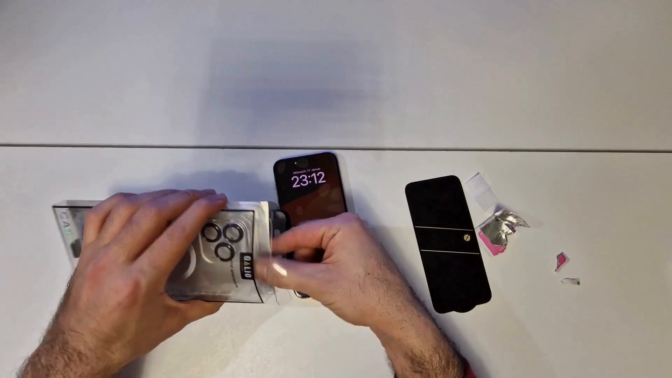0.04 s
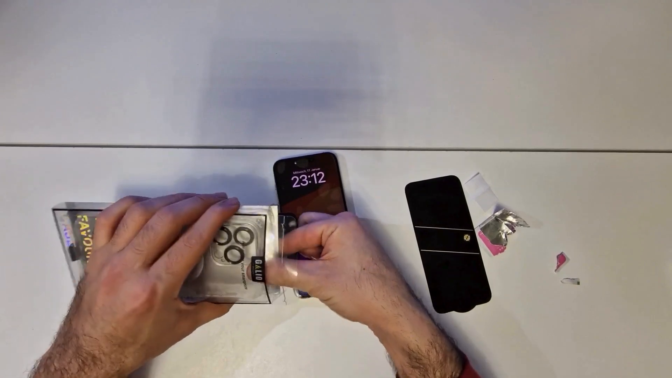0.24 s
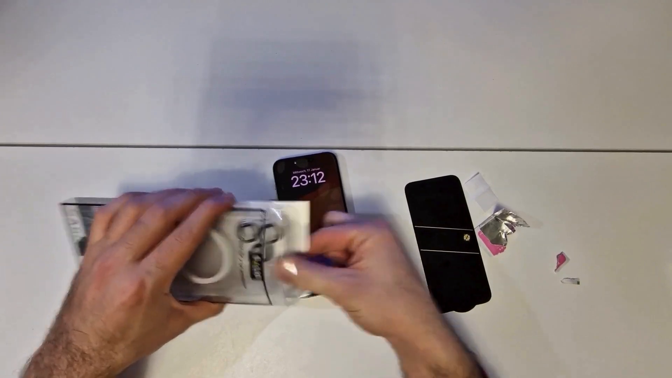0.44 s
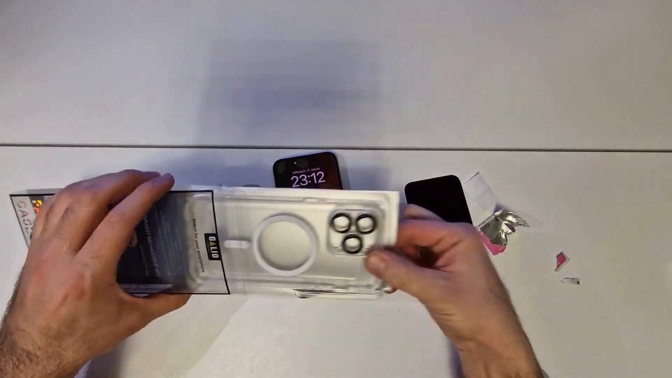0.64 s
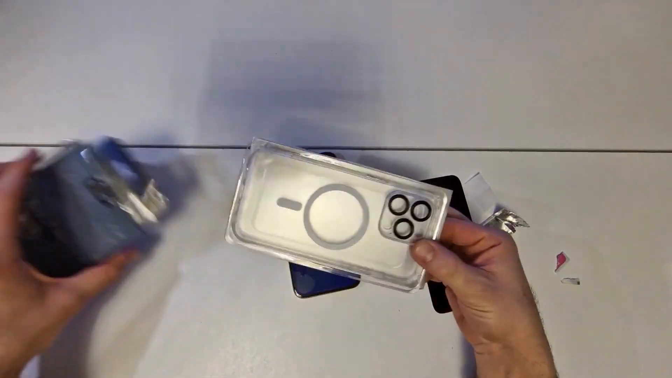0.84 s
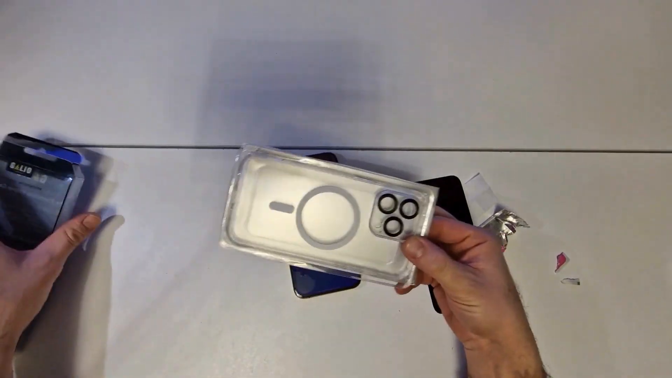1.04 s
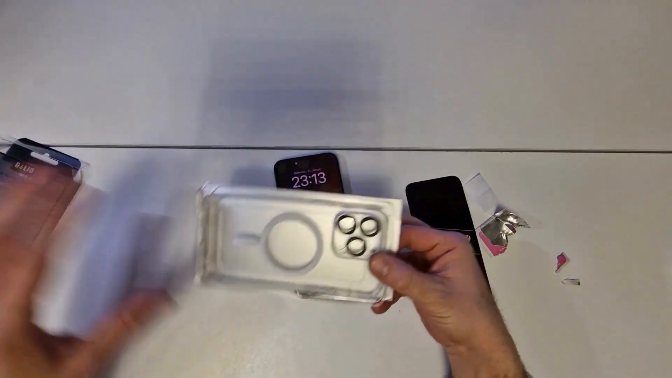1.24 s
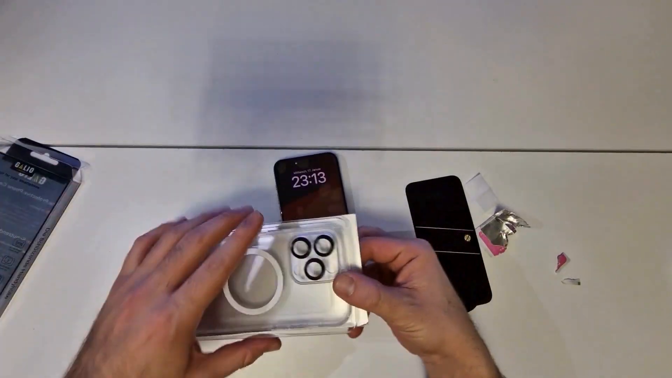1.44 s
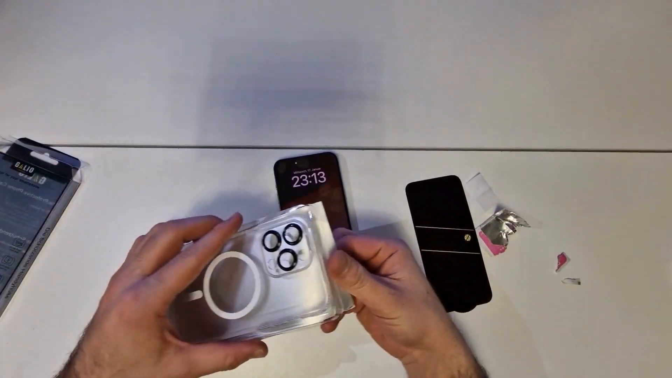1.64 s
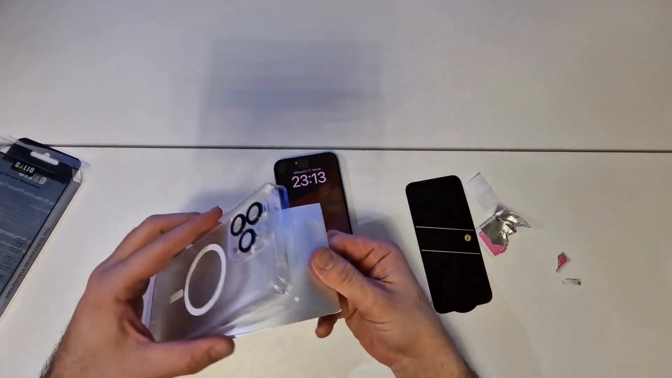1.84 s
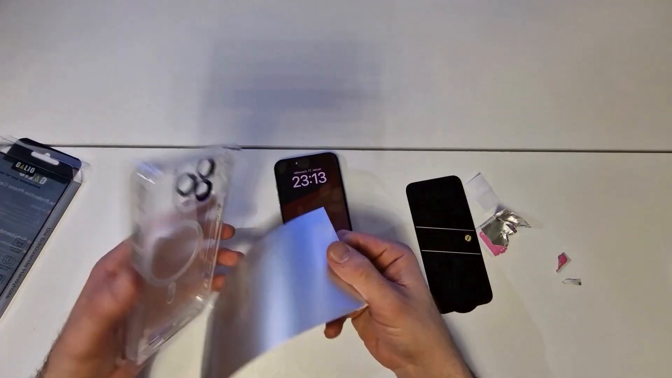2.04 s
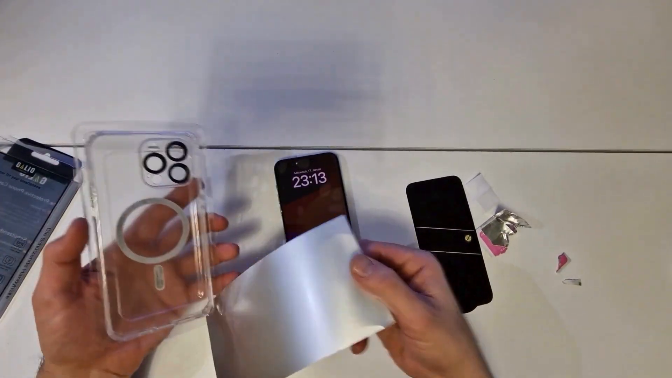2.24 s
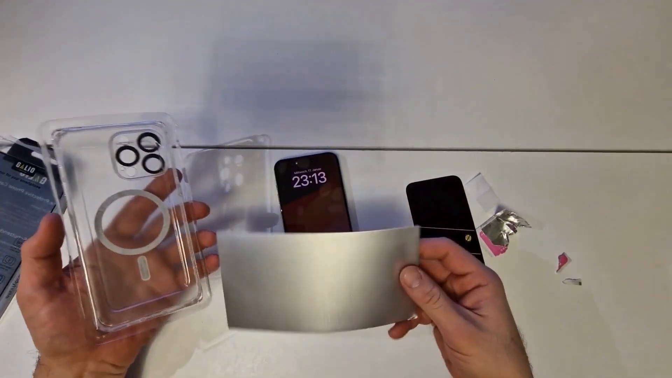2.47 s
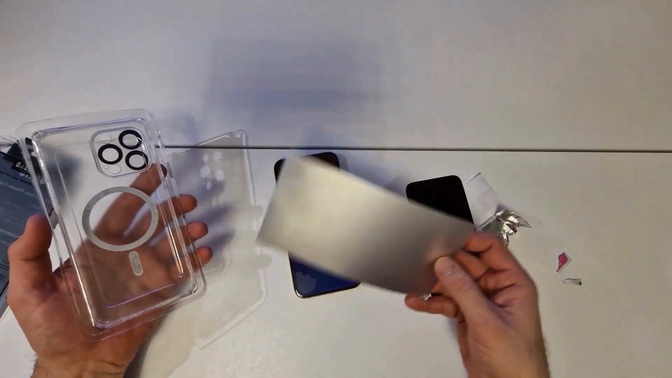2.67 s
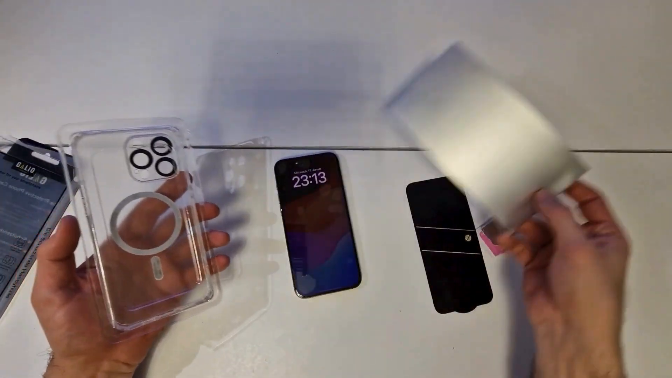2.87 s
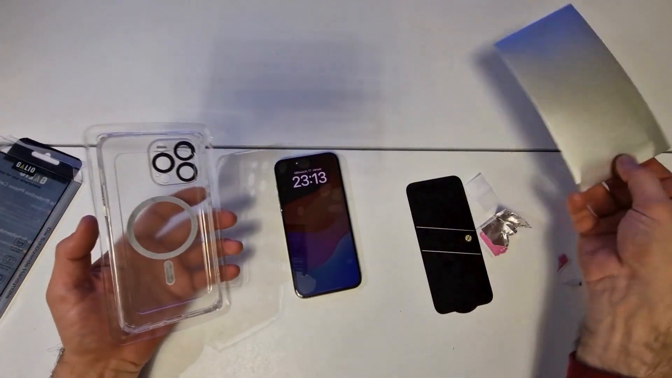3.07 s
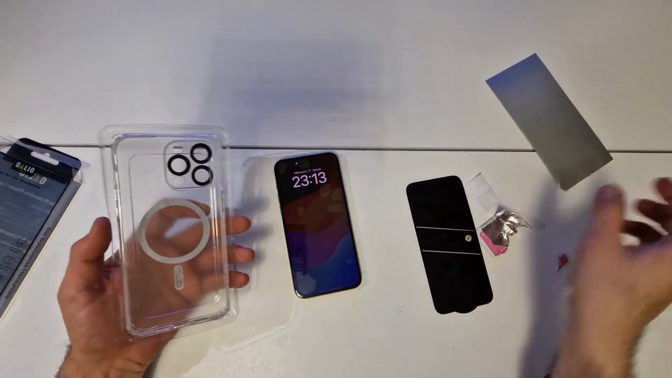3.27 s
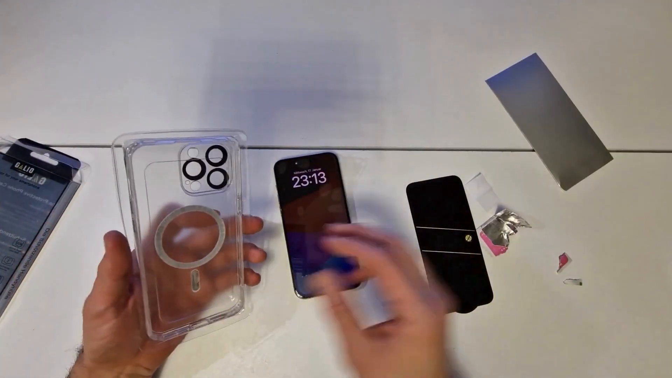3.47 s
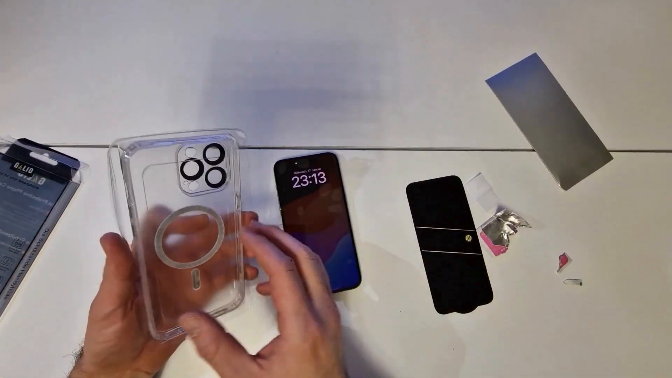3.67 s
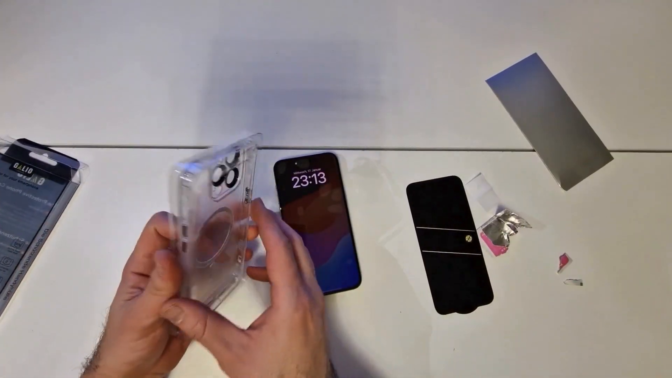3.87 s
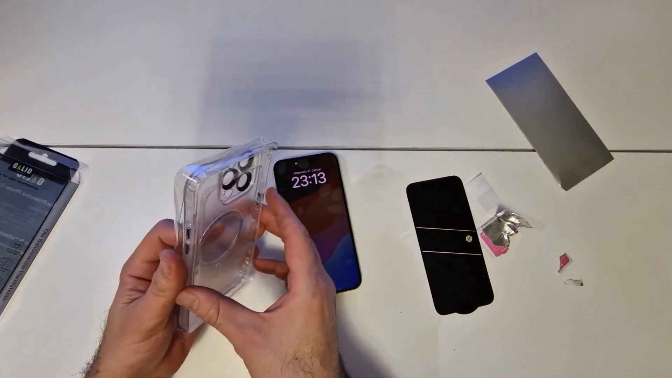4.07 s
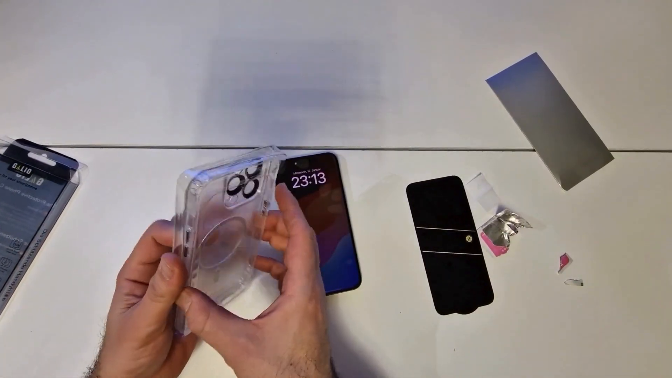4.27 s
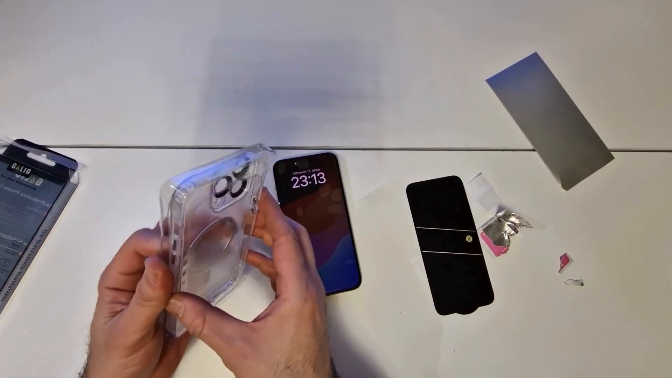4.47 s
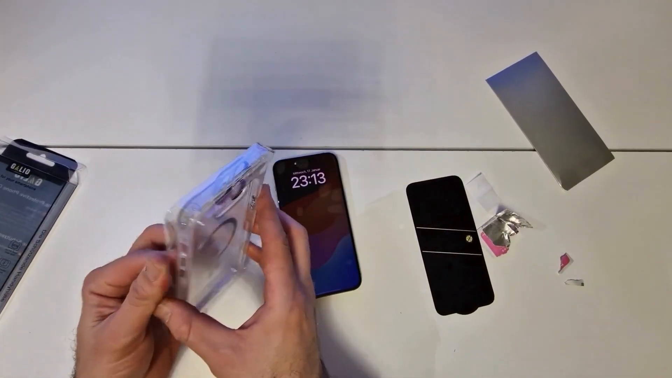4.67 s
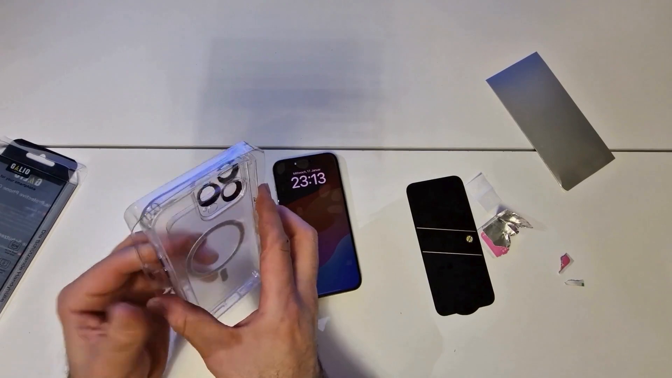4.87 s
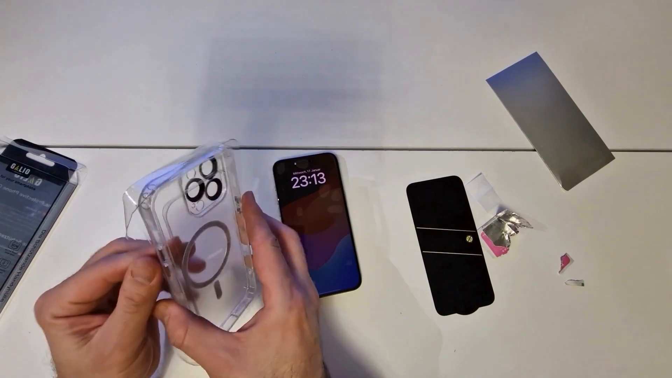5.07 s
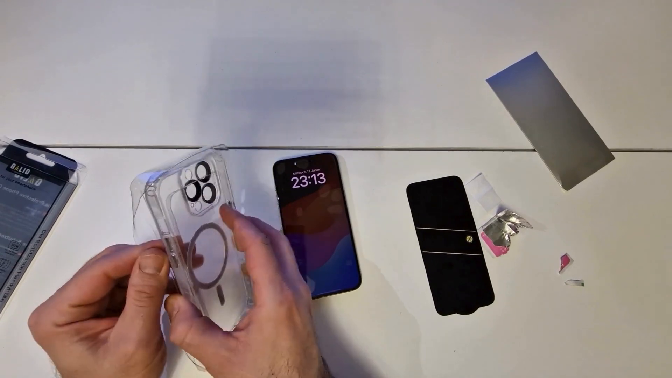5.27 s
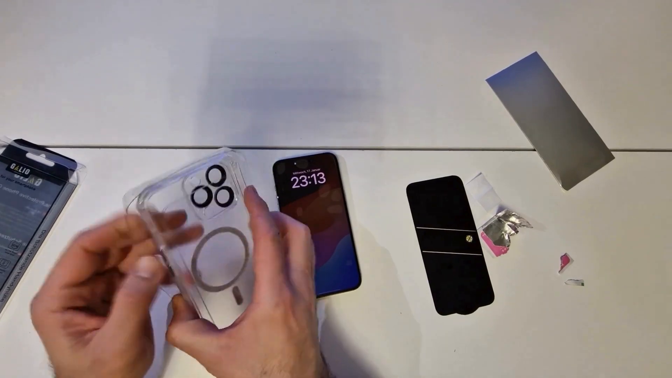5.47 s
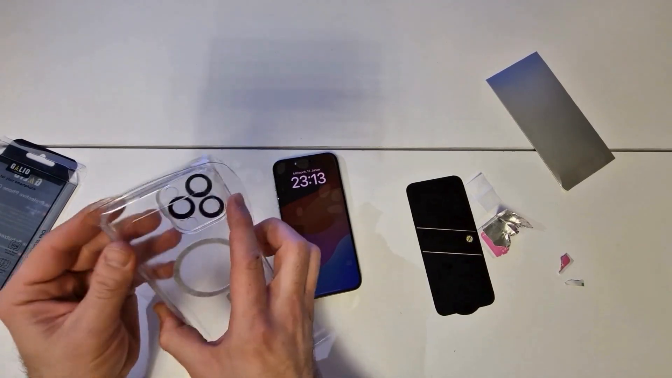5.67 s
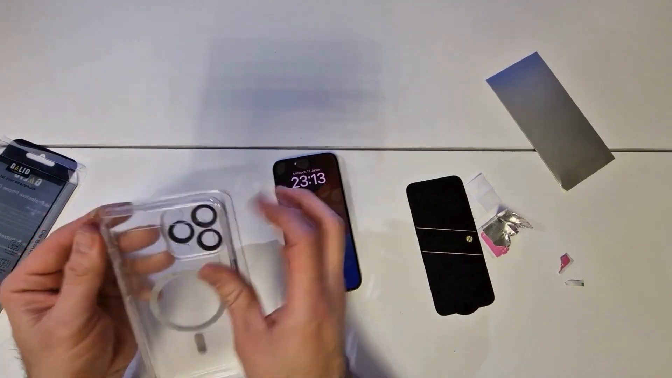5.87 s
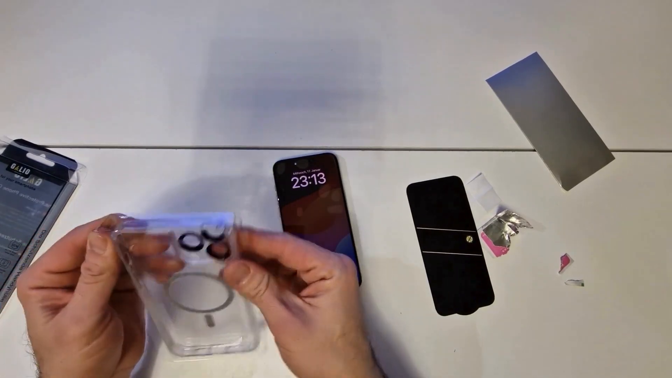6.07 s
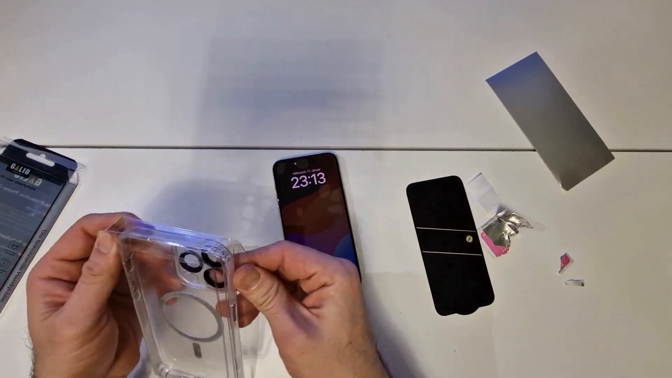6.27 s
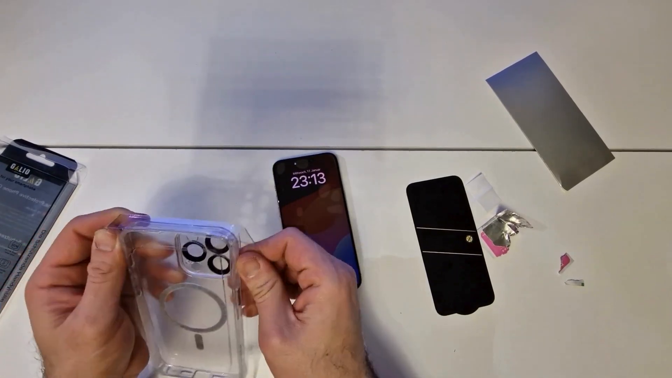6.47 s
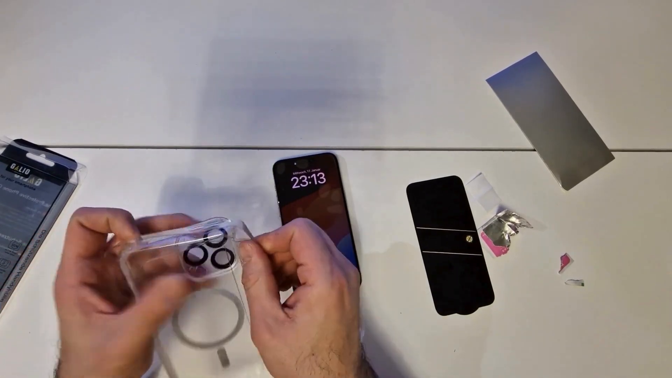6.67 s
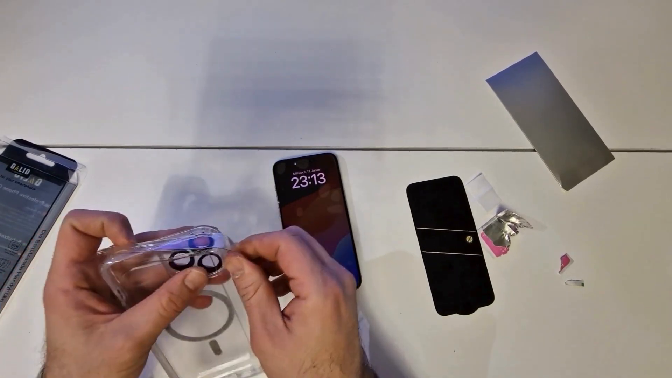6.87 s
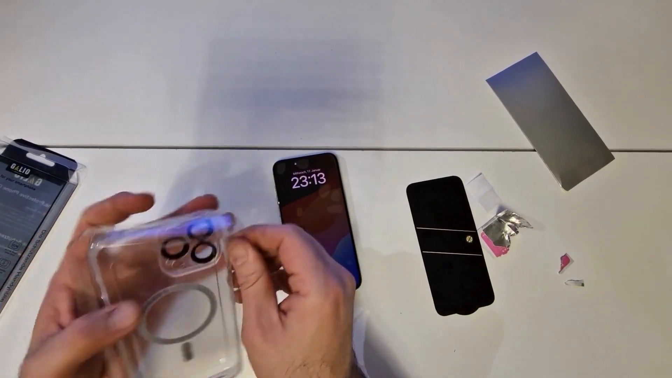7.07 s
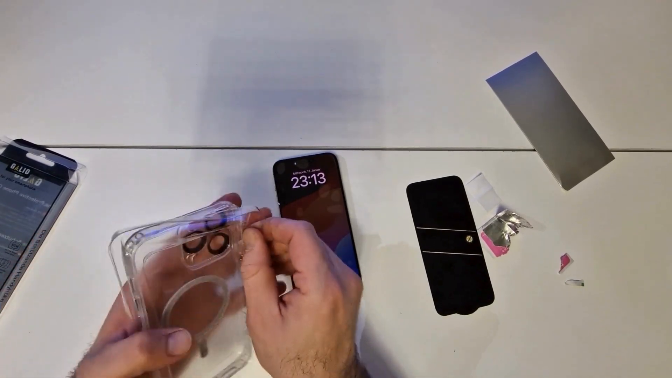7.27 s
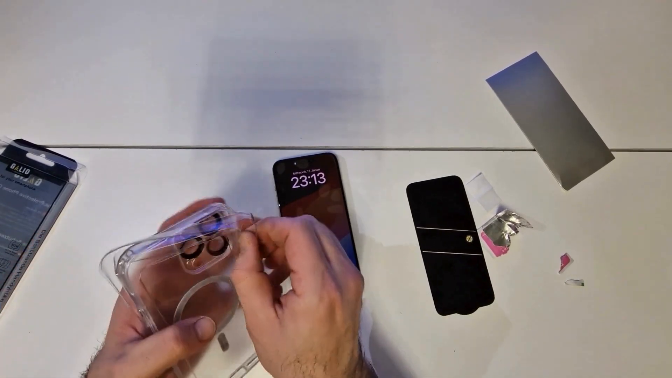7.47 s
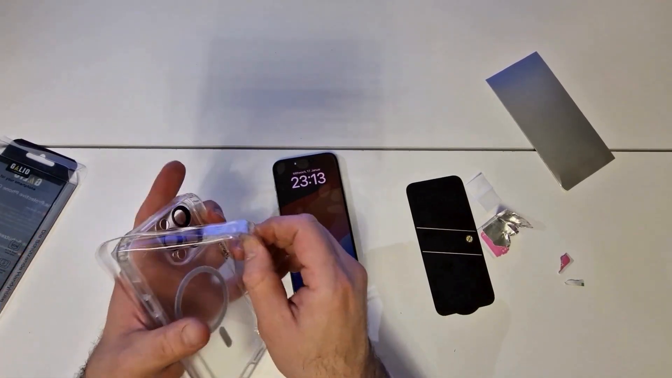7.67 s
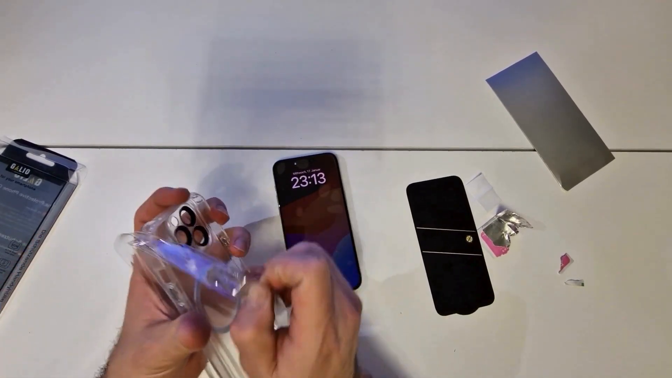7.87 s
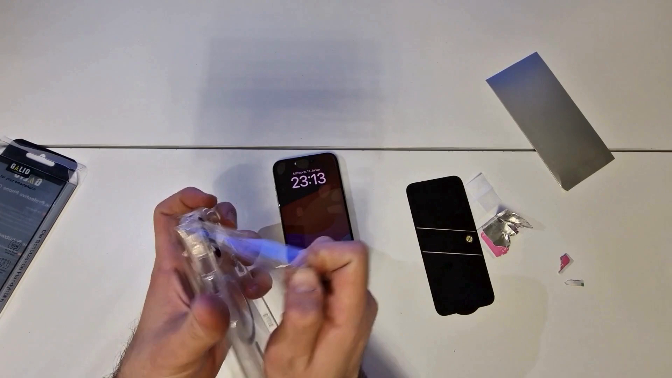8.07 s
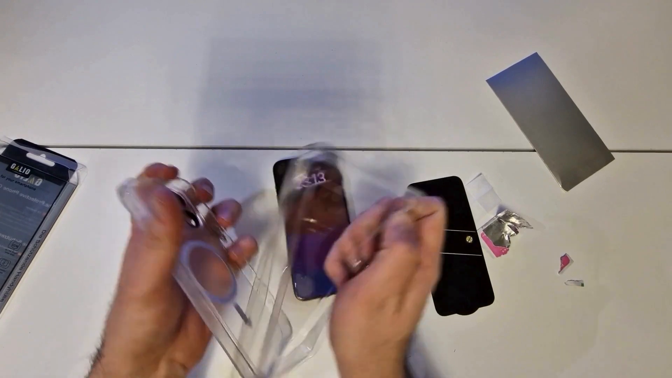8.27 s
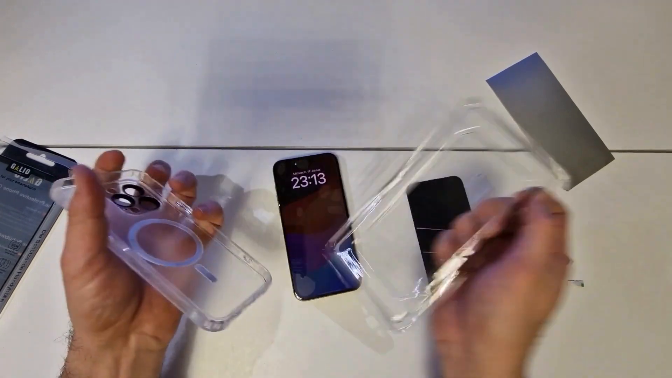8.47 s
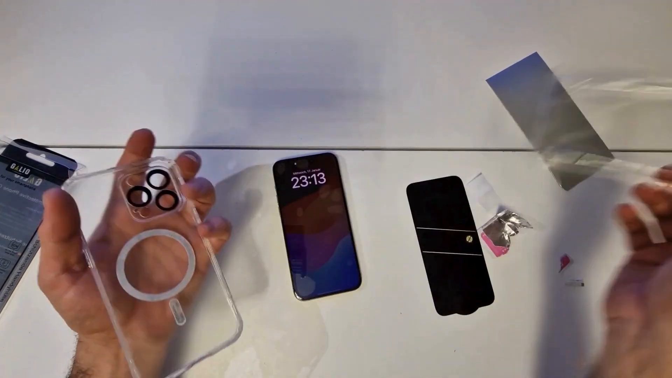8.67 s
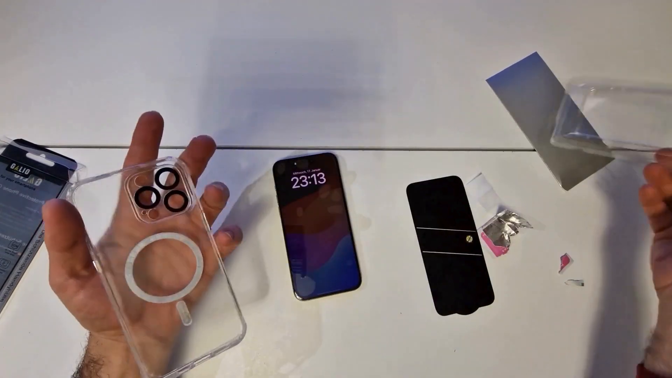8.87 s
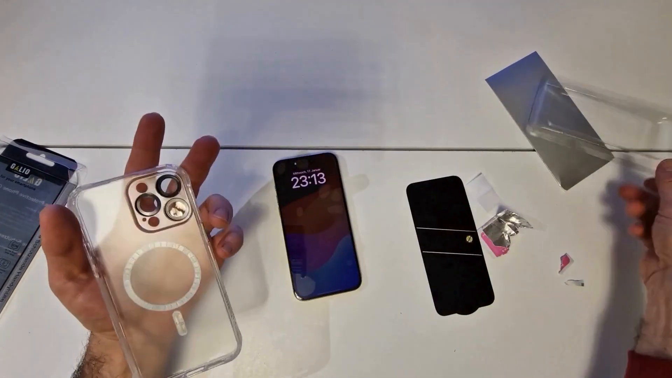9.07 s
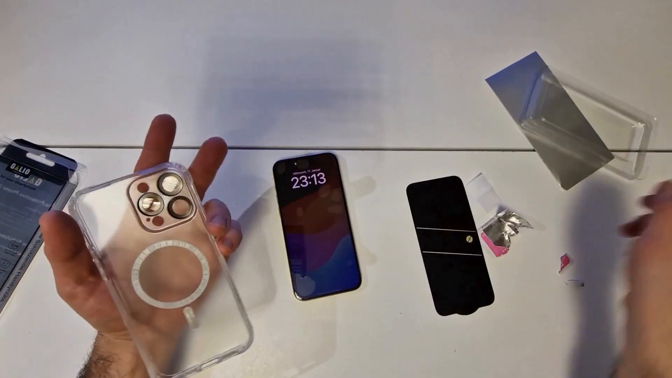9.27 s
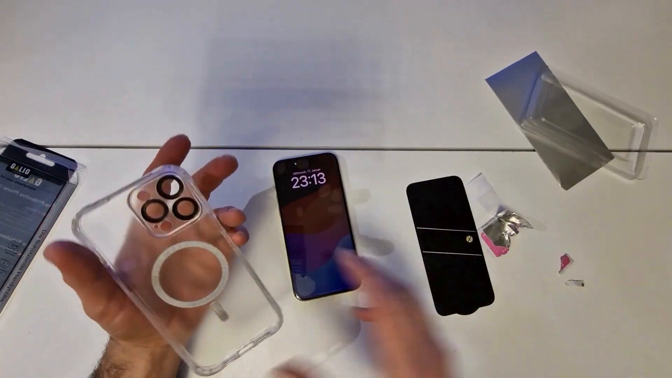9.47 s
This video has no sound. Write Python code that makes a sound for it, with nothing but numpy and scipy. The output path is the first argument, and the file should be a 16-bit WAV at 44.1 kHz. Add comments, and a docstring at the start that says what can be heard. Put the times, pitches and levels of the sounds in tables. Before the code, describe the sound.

Close plastic crackling: hollow rubs and a hard pop, faint fidgety clicks, a double crack, then dense sharp snapping and soft table thumps.

```python
"""Soft rubbing and small snaps come first: hands pull a clear plastic tray from its box over a table.
They lift out a card and prise the tray apart, with the thickest run of loud snaps near the end.
Snaps are short shaped noise bursts, rubs are noise strokes broken by catches, and ticks are tiny pops.
Thuds are noise through the table's low tones; a low rumble, a small room and a quiet hush lie behind."""
import sys
import numpy as np
from scipy import signal
from scipy.fft import rfft, irfft
from scipy.io import wavfile
from scipy.ndimage import uniform_filter1d

SR = 44100
rng = np.random.default_rng(int(sys.argv[2]) if len(sys.argv) > 2 else 0)


def master(y):
    """Save y as 16-bit WAV."""
    cut = np.clip(np.atleast_2d(y).T, -1, 1)
    pcm = np.round(cut * 32767)  # scale
    wavfile.write(sys.argv[1], SR, pcm.astype(np.int16))


N = 419832
BOX_GONE_S = 1.3  # before this time, snaps and scrapes have the hollow tone of the box


def gain_of(db):
    """Turns decibels into a gain."""
    return 10 ** (np.asarray(db) / 20)


def evened(x):
    """Scales a signal to an rms of 1."""
    return x / np.sqrt(np.mean(x ** 2) + 1e-20)


def read(points, hz):
    """Reads a table of (pitch, value) between its rows, on a log-pitch axis."""
    f, value = np.transpose(points)
    return np.interp(np.log(hz + 1), np.log(f + 1), value)


def over_time(rows):
    """Gives a window open only while a table lasts, then the table's columns at each sample."""
    t = np.arange(N) / SR
    s, *columns = np.transpose(rows)
    window = np.clip(np.minimum(t - s[0], s[-1] - t) / 0.0044, 0, 1)
    return window, *[np.interp(t, s, c) for c in columns]


def peak(hz, centre_hz, width):
    """Gain of one resonance: strongest at its centre, weaker to both sides."""
    return 1 / np.sqrt(1 + ((hz ** 2 - centre_hz ** 2) / (hz * width + 1)) ** 2)


def coloured(pair, gain):
    """Shapes two unrelated noises by gain(hz) into a left and right that agree by band."""
    # How alike left and right are: pitch_hz, likeness (0 to 1)
    likeness = [(150, .9), (700, .85), (1500, .55), (3000, .3), (7000, .42), (14000, .58)]
    hz = np.fft.rfftfreq(pair.shape[1], 1 / SR)
    a, b = rfft(pair) * gain(hz)
    same = np.clip(read(likeness, hz), 0, 1)
    right = same * a + np.sqrt(1 - same ** 2) * b
    return evened(irfft([a, right], pair.shape[1]))


def patchy(x):
    """Makes random patches of sound, about 700 Hz by 40 ms, swell and sink."""
    spread_db = 3  # how far the colour wanders
    z = signal.stft(x, nperseg=256)[2]
    field = uniform_filter1d(rng.standard_normal(z.shape[1:]), size=4, axis=0)
    field = evened(uniform_filter1d(field, size=14, axis=1))
    lift = evened(gain_of(spread_db * field))
    return signal.istft(z * lift, nperseg=256)[1][:, :N]


def add(mix, s, sound):
    """Mixes a stereo sound in at s seconds."""
    part = mix[:, round(s * SR):][:, :sound.shape[1]]
    part += sound[:, :part.shape[1]]


def hollow(hz):
    """Gain of the card box, whose air and walls favour a few tones."""
    # Tones of the box: pitch_hz, width_hz, level_db
    box_tones = [(520, 260, -8), (820, 260, -1), (1398, 330, -3), (2100, 1500, -11)]
    return sum(gain_of(db) * peak(hz, centre, width) ** 2 for centre, width, db in box_tones)


def burst_level(x):
    """Scales a burst so that its energy, spread over 10 ms, has an rms of 1."""
    return x / np.sqrt(np.sum(x ** 2) / 2 / (SR // 100))


def snaps():
    """A panel creaks, then pops over in jerks: a pitched crack, a fizz of edges, a longer hollow ring."""
    # Buckling snaps: start_s, level_db, pitch_hz, fizz_db (fizz against the crack)
    snap_list = [(0.113, -28.5, 1440, -11), (0.164, -23.5, 1300, -11.5), (0.363, -31, 880, -12.5),
                 (0.398, -28.5, 853, 0), (0.451, -25, 770, -9), (0.607, -3.5, 1850, 2.5),
                 (0.835, -28, 1000, 1), (0.884, -23.5, 1340, 2), (1.133, -35, 832, -0.5),
                 (1.217, -22, 745, 3), (1.522, -36.5, 1310, -9), (1.664, -17, 6660, -0.5),
                 (1.839, -21.5, 1550, 4.5), (1.961, -21, 1740, -1), (1.971, -9.5, 1330, -5),
                 (2.157, -19.5, 6400, 3), (2.334, -42, 1240, -10), (2.629, -42, 1946, -17),
                 (3.384, -24.5, 7000, 5), (3.697, -52.5, 2610, -17), (3.764, -32.5, 2320, -7),
                 (3.826, -42, 1160, -12), (3.85, -38, 1600, -20), (3.866, -36.5, 1210, -28),
                 (3.912, -36, 1240, -25), (3.956, -43, 2220, -2), (3.992, -31, 1410, -35),
                 (4.037, -42.5, 2210, -8), (4.139, -45.5, 2190, -3), (4.284, -45.5, 2100, 0),
                 (4.338, -32, 1310, -12), (4.367, -30, 1800, -11), (4.408, -24, 6900, 5),
                 (4.417, -21, 7260, -13), (4.502, -32, 2200, 0), (4.585, -39.5, 7500, -14),
                 (4.64, -34, 2180, 0), (4.644, -21.5, 3240, -2), (4.653, -24, 1850, 0.5),
                 (4.77, -29.5, 2030, -19), (4.794, -30, 7400, 4.5), (4.821, -34, 3200, 8),
                 (4.972, -34.5, 3130, -12), (5.036, -34.5, 3080, -3), (5.046, -32, 2800, -9),
                 (5.142, -34, 2200, 1), (5.159, -31.5, 3060, -2.5), (5.237, -46, 1670, -25),
                 (5.26, -25.5, 1740, -12), (5.314, -29.5, 1860, -7), (5.343, -24.5, 1780, 5),
                 (5.462, -40.5, 720, -2), (5.554, -35.5, 1420, -25), (5.577, -37.5, 1160, -29),
                 (5.63, -30.5, 1690, -31), (5.666, -21.5, 1550, -28), (5.727, -44, 1480, 17),
                 (5.817, -24.5, 2170, 3), (5.864, -30, 1500, -9), (5.891, -18, 690, -13),
                 (5.916, -7, 740, 2), (5.965, -18, 716, 7.5), (6.047, -24.5, 730, 5), (6.061, -27, 2350, 6),
                 (6.113, -32, 2390, 6), (6.132, -29.5, 7150, -2), (6.209, -27.5, 4800, -2),
                 (6.226, -21, 2180, 10.5), (6.394, -21.5, 4280, 7), (6.475, -30.5, 1820, 7),
                 (6.497, -15, 4270, -2), (6.517, -31.5, 1340, -4), (6.584, -31, 1660, 12),
                 (6.616, -18, 1980, -3), (6.66, -16.5, 7700, 8.5), (6.676, -17.5, 7350, 10.5),
                 (6.697, -11, 3740, 4), (6.757, -3, 2880, 2), (6.759, -5, 910, -8), (6.783, -6, 860, 2),
                 (6.872, -16.5, 2800, -1), (6.907, -31, 2940, 16), (6.944, -15, 1280, -7),
                 (7.086, -26, 1560, -16.5), (7.095, -40.5, 8900, 24.5), (7.143, -21, 750, 5),
                 (7.22, -25, 3600, -16), (7.241, -28, 1430, -3), (7.269, -23.5, 2260, -15),
                 (7.281, -20, 7900, 0), (7.312, -13, 8000, -1.5), (7.374, -18, 4000, -4),
                 (7.386, -13, 3680, 7.5), (7.394, -21.5, 2690, -3), (7.494, -16, 3050, 3),
                 (7.57, -15, 1810, 13), (7.594, -11, 1480, 5), (7.614, -3.5, 3260, 3),
                 (7.66, -18.5, 3200, -17), (7.702, -5, 8100, 8.5), (7.731, -9.5, 1890, -14.5),
                 (7.753, -5.5, 2780, 6), (7.763, -11, 3070, -12), (7.811, -11.5, 2700, 4),
                 (7.83, -6.5, 5150, -4), (7.895, -14.5, 3080, -2.5), (7.919, -3.5, 3680, 4),
                 (7.981, -12, 3000, 8), (8.041, -6, 3700, 4.5), (8.123, -21, 4430, -21.5),
                 (8.147, -5, 1370, 7), (8.207, -17, 6200, -14), (8.222, -1, 7440, 1.5),
                 (8.251, -9.5, 1670, 8.5), (8.307, -15.5, 3760, 12), (8.396, -30, 1770, 18),
                 (8.424, -13, 2090, 0), (8.432, -7, 1410, 12.5), (8.519, -8, 730, 8), (8.531, -4, 626, 0.5),
                 (8.627, -25.5, 7110, 8), (8.825, -38.5, 670, -17), (9.076, -18, 5860, -4),
                 (9.253, -16.5, 6560, -26), (9.258, -8.5, 2040, -3.5)]
    base_t60_s, size_law = 0.032, 0.053  # ring at 2 kHz, and how much longer low panels ring
    t60_spread, box_bend = 0.25, 0.07  # chance spread of ring, and of the squeezed box's tones (shares)
    spike, spike_s = 1.6, 0.0006  # extra gain of the first jerk, and its time constant
    dull_db = -15  # snaps with less fizz than this also lose their broad middle
    out, t = np.zeros((2, N)), np.arange(-1024, 3072) / SR
    after = np.maximum(t, 0)

    for s, db, hz, fizz_db in snap_list:
        noise = rng.standard_normal((3, 2, len(t)))
        t60 = base_t60_s * (2000 / hz) ** size_law * np.exp(t60_spread * rng.standard_normal())
        bumps = evened(uniform_filter1d(rng.standard_normal(len(t)), size=40))
        jerks = gain_of(3.2 * bumps) * (1 + spike * np.exp(-abs(t - spike_s) / spike_s))
        creak = 0.012 * np.exp(np.minimum(t, 0) / (0.2 * t60))  # grows until the pop
        onset = jerks * (creak + 1 - np.exp(-after / (0.037 * t60)))

        def fall(stretch):
            """Rise and dying away, with the ring time stretched."""
            return onset * gain_of(-60 * after / (t60 * stretch))

        bend = np.exp(box_bend * rng.standard_normal())
        broad = 0.41 * gain_of(min(fizz_db - dull_db, 0))
        crack = coloured(noise[0] * fall(0.96),
                         lambda f: peak(f, hz, 0.52 * hz) ** 1.4 + broad * peak(f, 1700, 3700) ** 2)
        fizz = coloured(noise[1] * fall(1.0), lambda f: f ** 2 / (f ** 2 + 5000 ** 2))
        if s < BOX_GONE_S:
            body = coloured(noise[2] * fall(2.6), lambda f: hollow(f * bend))
        else:
            body = coloured(noise[2] * fall(2.6), lambda f: peak(f, 640, 350) ** 2)
        # A crack's crest stands above its 10 ms level, so lower that level to match
        sharp = gain_of(-11.5) * (burst_level(crack) + gain_of(fizz_db) * burst_level(fizz))
        ring = gain_of(-33.0) * 1500 / hz * burst_level(body)  # low snaps ring the hollow more
        add(out, s + t[0], gain_of(db) * (sharp + ring))
    return out


def stutter(per_s, spread_db, t60):
    """Stick and slip: small catches of uneven size, each dying quickly, over a steady contact."""
    size = gain_of(spread_db * np.minimum(rng.exponential(1, N), 4))
    catches = size * (rng.random(N) < per_s / SR)
    return evened(1.3 + signal.lfilter([1], [1, -gain_of(-60 / (t60 * SR))], catches))


def rubbing():
    """Sliding surfaces make noise that swells and fades, broken by catches; the box colours it at first."""
    # Strokes of plastic, card and fingers: start_s, length_s, scrape_db, hiss_db
    strokes = [(0, 0.038, -41.5, -44), (0.089, 0.27, -46.5, -48.5), (0.376, 0.36, -48, -47.5),
               (0.536, 0.1, -26.5, -27.5), (.61, 0.37, -44.5, -41), (0.826, 0.098, -40.5, -42),
               (1.206, 0.046, -31, -35), (1.45, 0.86, -60, -59.5), (1.814, 0.062, -51.5, -50),
               (1.893, 0.11, -52, -59), (2.075, 0.12, -40.5, -44.5), (2.312, 0.32, -53, -66),
               (2.434, 0.12, -75, -45.5), (2.553, 0.29, -76.5, -69), (2.805, 0.21, -62.5, -62),
               (4.373, 0.081, -42, -39.5), (4.595, 0.47, -59, -57), (5.839, 0.18, -34.5, -35.5),
               (6.193, 0.072, -40, -38), (6.645, 0.27, -32.5, -31), (7.092, 0.28, -40.5, -43),
               (7.568, 0.34, -36.5, -34.5), (7.913, 0.55, -38, -28.5), (8.191, 0.039, -17.5, -13),
               (8.242, 0.18, -38, -42), (8.392, 0.16, -28, -37), (8.452, 0.19, -32.5, -37),
               (8.773, 0.081, -53.5, -76.5)]
    # Colour of the scrape once the box is gone: pitch_hz, level_db
    scrape_colour = [(150, -30), (450, -7.5), (800, -3), (1400, -4), (2100, -7), (3200, -8.5), (5000, -14)]
    rise = 0.25  # share of a stroke in which the push builds
    light_hz, light_law = 1000, 3  # below this pitch, dB lost per dB of hiss above the scrape
    noise = rng.standard_normal((3, 2, N)) * stutter(per_s=230, spread_db=6.5, t60=0.07)
    t, push = np.arange(N) / SR, np.zeros((3, N))
    box = coloured(noise[2], hollow)
    bare = coloured(noise[0], lambda f: gain_of(read(scrape_colour, f)))
    scrape = np.where(t < BOX_GONE_S, box, bare)
    hiss = coloured(noise[1], lambda f: f ** 3 / (f ** 3 + 3500 ** 3))
    low = signal.sosfiltfilt(signal.butter(2, light_hz, fs=SR, output="sos"), scrape)
    for start, length, scrape_db, hiss_db in strokes:
        low_db = scrape_db - light_law * max(hiss_db - scrape_db, 0)
        corners = start + length * np.array([0, rise, 1])
        swell = np.interp(t, corners, [0, 1, 0]) ** 0.5
        push += gain_of([scrape_db, hiss_db, low_db])[:, None] * swell
    return patchy(push[0] * (scrape - low) + push[1] * hiss + push[2] * low)


def ticks():
    """Fingers working the tray set off tiny pops, each from a patch of its own pitch."""
    # Level of the ticks through time: time_s, level_db
    fidget_levels = [(3.6, -80.5), (3.9, -63.5), (4.2, -72), (4.5, -68), (5.3, -59.5), (5.7, -66),
                     (6.3, -88), (7.05, -75.5), (7.6, -50), (8.4, -37), (8.7, -60.5)]
    on, db = over_time(fidget_levels)
    size = gain_of(3.5 * np.minimum(rng.exponential(1, N), 4))
    hits = size * (rng.random(N) < 110 / SR)  # about 110 a second
    patch, t, out = rng.integers(0, 12, N), np.arange(1024) / SR, np.zeros((2, N))
    shape = np.sin(np.pi / 2 * np.minimum(t / 0.0017, 1)) * gain_of(-60 * t / 0.028)
    for k, hz in enumerate(np.geomspace(900, 7000, num=12)):
        noise = rng.standard_normal((2, len(t)))
        pop = coloured(noise, lambda f: peak(f, hz, 0.88 * hz) ** 2) * shape
        out += signal.oaconvolve((hits * (patch == k))[None], pop, axes=1)[:, :N]
    return on * gain_of(db) * evened(out)


def thuds():
    """A soft blow shakes the table's broad low tones; a heavier one favours the lowest."""
    # Blows to the table top: start_s, peak_db, weight_db (boost of the lowest tones against the rest)
    blows = [(0.162, -40.5, 6.5), (0.558, -32.5, 2), (0.608, -25.5, -6.5), (0.876, -32, -2),
             (1.127, -27, -15), (1.217, -24.5, -14), (1.971, -36.5, -20.5), (3.35, -42, 11),
             (3.387, -39, 16), (3.992, -54, 45), (4.408, -44.5, 33), (5.894, -28.5, -1),
             (6.757, -22.5, -9.5), (7.143, -38, -1), (7.37, -34.5, -12), (7.599, -34, -5.5),
             (7.701, -36, 2), (7.92, -32, 2), (8.209, -21.5, -2), (8.424, -22.5, 3), (8.514, -29.5, 10),
             (8.826, -38.5, -19), (9.078, -29, -6), (9.249, -29, 1)]
    # Tones of the table: pitch_hz, width_hz, level_db
    table_tones = [(73.5, 5.6, 0.5), (129.6, 190, 1), (228, 56, -11), (347, 1200, -1), (650, 390, -3.5)]
    weight_hz = 190  # tones below this follow the weight of the blow
    out, t = np.zeros((2, N)), np.arange(16384) / SR
    for s, db, weight_db in blows:
        def modes(f):
            """Gain of the table under this blow."""
            tones = sum(gain_of(d) * peak(f, hz, w) ** 2 for hz, w, d in table_tones)
            return tones * gain_of(weight_db / (1 + (f / weight_hz) ** 2.7))

        shake = coloured(rng.standard_normal((2, len(t))), modes)
        shake *= (1 - np.exp(-t / 0.0034)) * gain_of(-60 * t / 0.19)
        add(out, s, gain_of(db) * shake / abs(shake).max())
    return out


def air():
    """Arms on the table and air pushed by the swung card make a low, lumpy rumble."""
    # Level of the rumble through time: time_s, level_db
    rumble_levels = [(0, -75), (2.2, -84), (2.55, -62.5), (3.1, -87.5), (3.45, -80), (5.5, -77.5),
                     (6.1, -75.5), (9.5, -77.5)]
    rumble = coloured(rng.standard_normal((2, N)), lambda f: peak(f, 60, 140) ** 2)
    return gain_of(over_time(rumble_levels)[1]) * rumble


def room(x):
    """Dense reflections die by band; three tails take turns so that like snaps do not sound alike."""
    # How long the room rings: pitch_hz, t60_s (time to fall by 60 dB)
    ring_times = [(200, 0.44), (600, 0.21), (1500, 0.31), (4000, 0.33), (10000, 0.28)]
    out, turn = np.zeros((2, N)), np.arange(N) / SR * 9.0
    for k in range(3):
        noise = coloured(rng.standard_normal((2, SR // 2)), np.ones_like)
        hz, t, z = signal.stft(noise, SR, nperseg=256)
        fading = z * gain_of(-60 * t / read(ring_times, hz)[:, None])
        tail = signal.istft(fading, SR, nperseg=256)[1]
        tail *= np.clip((np.arange(tail.shape[1]) / SR - 0.003) / 0.0013, 0, 1)  # silent for 3 ms
        share = np.sqrt(2 / 3) * np.cos(turn + k * np.pi / 3)
        sent = share * x.mean(0)[None]
        out += signal.fftconvolve(sent, tail / np.linalg.norm(tail[0]), axes=1)[:, :N]
    return out


def hush():
    """A quiet bed of noise whose colour wanders in patches."""
    # Colour of the hush: pitch_hz, level_db (per Hz, relative)
    hush_colour = [(25, -21), (60, -3), (400, -18.5), (1100, -9), (4000, -19), (7700, -11), (9000, -25),
                   (14000, -16.5)]
    noise = coloured(rng.standard_normal((2, N)), lambda f: gain_of(read(hush_colour, f)))
    return gain_of(-74) * patchy(noise)


def scene():
    """Places the sources left or right, then adds the room and its hush."""
    # Place through time: time_s, left_minus_right_db, right_late_ms (below zero: right is early)
    places = [(0, 3.5, 0), (1.2, 1.5, -0.22), (1.5, 3, 0.069), (2.4, 4, 0.012), (3.2, 7.5, 0.34),
              (3.6, 3, 0), (8.4, 2, 0.0065), (8.7, 7, .3)]
    side_db, late_ms = over_time(places)[1:]
    thin = signal.butter(2, 260, "high", fs=SR, output="sos")  # snaps, rubs and ticks carry little bass
    sheets = signal.sosfilt(thin, snaps() + rubbing() + ticks())
    left, right = (sheets + thuds() + air()) * gain_of([side_db / 2, -side_db / 2])
    late = np.round(late_ms * SR / 1000).astype(int)
    near = np.array([left, right[np.clip(np.arange(N) - late, 0, N - 1)]])
    echoes = gain_of(-6.5) * room(near) * gain_of([[0.5], [-0.5]])  # a touch louder on the left
    return near + echoes + hush()


def record(dry):
    """Microphone colour with a dip near 1 kHz and a treble notch, soft overload, then a band limit."""
    # Colour of the microphone: pitch_hz, level_db
    mic_colour = [(820, 0.34), (1020, -3.5), (1280, 0), (2500, 1), (4500, -0.5), (7300, 0), (8600, -4.5),
                  (9900, -12), (12500, -9.5), (15000, -10), (16000, -35)]
    edge_hz, ceiling = 16700, 0.82
    hz = np.linspace(0, SR / 2, 1025)
    mic = signal.firwin2(767, hz, gain_of(read(mic_colour, hz)), fs=SR)
    heard = signal.oaconvolve(dry, mic[None], "same")
    heard = np.tanh(heard / ceiling) * ceiling  # the loudest cracks are rounded off
    limit = signal.firwin(511, edge_hz, window=("kaiser", 12), fs=SR)
    return signal.oaconvolve(heard, limit[None], "same")


dry = scene()
out = record(dry)
master(out)
```